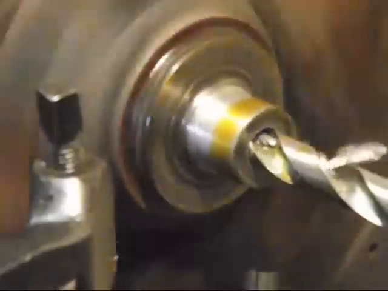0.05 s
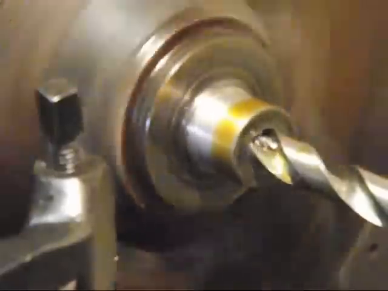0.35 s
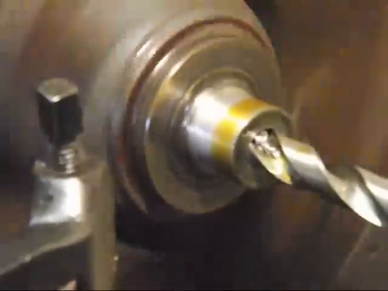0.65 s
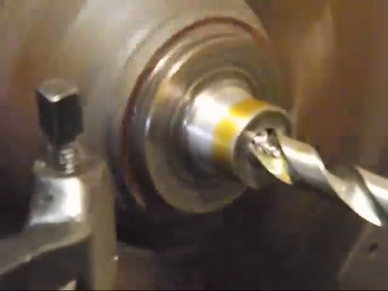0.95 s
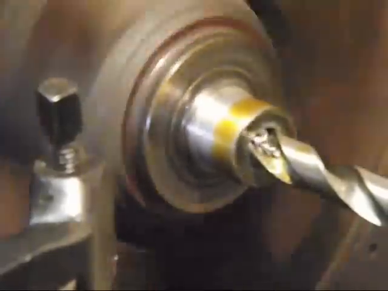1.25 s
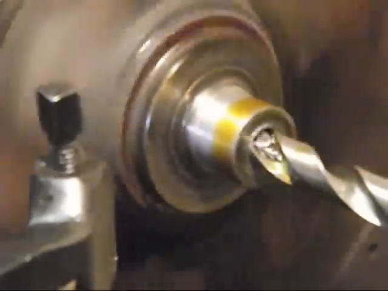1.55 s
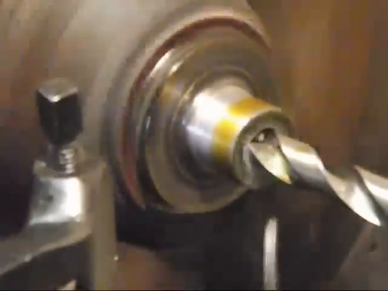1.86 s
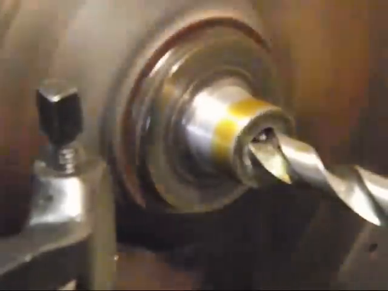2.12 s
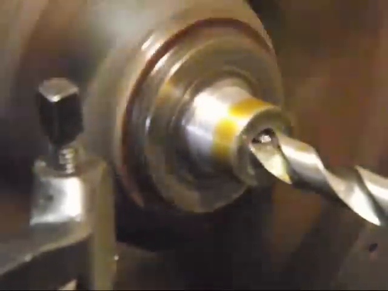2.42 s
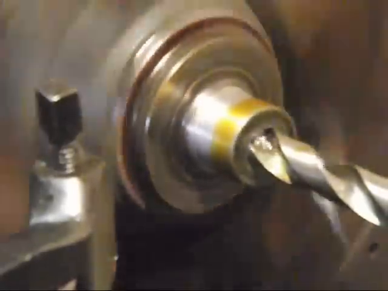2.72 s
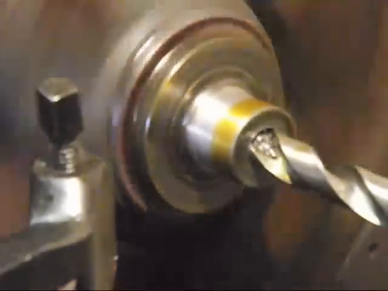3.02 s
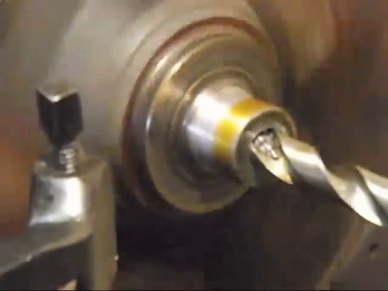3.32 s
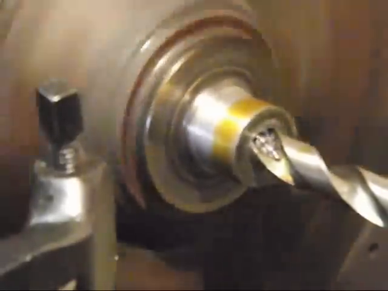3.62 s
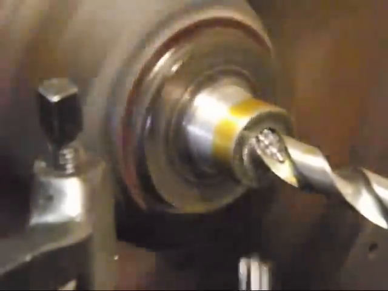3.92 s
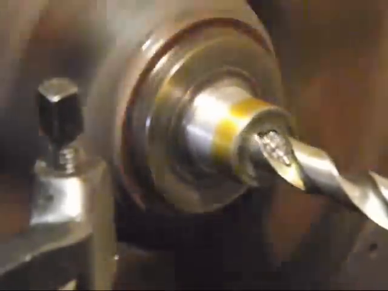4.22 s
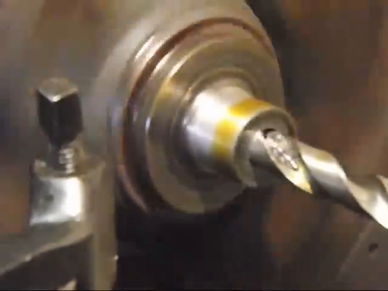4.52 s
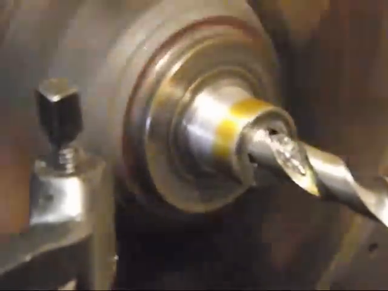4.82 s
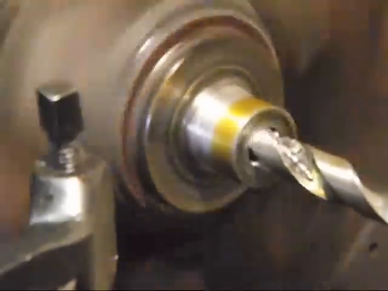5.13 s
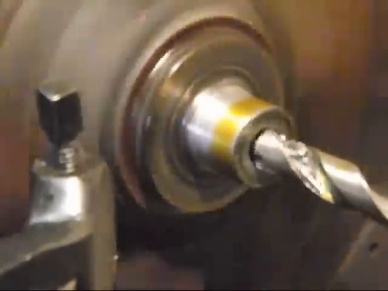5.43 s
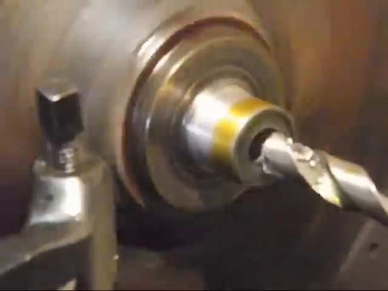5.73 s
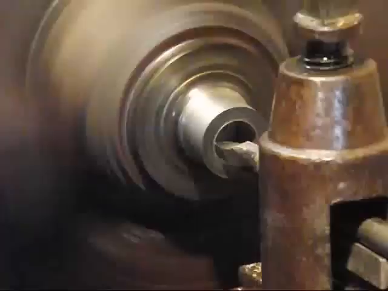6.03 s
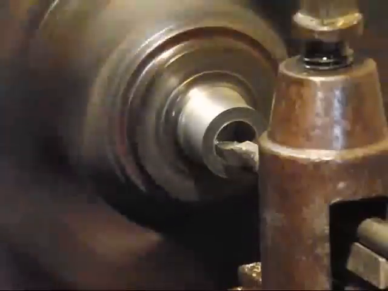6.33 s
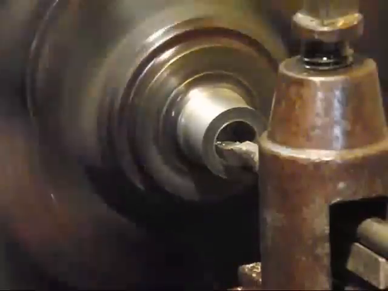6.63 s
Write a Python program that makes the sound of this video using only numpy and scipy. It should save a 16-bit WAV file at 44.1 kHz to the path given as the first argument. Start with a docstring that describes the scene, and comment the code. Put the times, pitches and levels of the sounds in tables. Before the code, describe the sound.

A metal lathe runs close to the microphone in a workshop for the whole six and a half seconds or so. Its loose drive makes a dense gear clatter with a fast rattle, about thirteen pulses a second, growing harder and softer with the load. Sharp metallic knocks land irregularly, roughly twice a second, the hardest at about 0.7, 3.1 and 4.8 seconds. A sheet-metal panel briefly rings hollow, most clearly near 1.8, 4.9 and 5.9 seconds. Under the clatter, a drill bit cutting the spinning steel gives a rough, wavering high ring, strongest around 2 seconds, near 5 and just before 6. A quiet low motor hum lies beneath everything. At about 6 seconds the microphone changes position: the clatter continues with a slightly different tone and the drill's ring drops back. The room sound is short and slight, the treble gritty and a little overloaded.

```python
"""A loose lathe drive clatters without pause, close to the microphone in a workshop, and rattles once a
spindle turn, harder or softer as belt and wheels swing the load. Now and then the slack closes with a
hard knock or a sheet-metal panel rings along. A drill cuts the spinning steel and makes it sing near
2 kHz; the motor hums below. Near the end the microphone moves from beside the drill to behind the
tool post. It sits in a small camera that overloads and samples coarsely, so the treble is gritty."""
import sys
import numpy as np
from scipy import signal
from scipy.fft import rfft, irfft, next_fast_len
from scipy.io import wavfile
from scipy.ndimage import map_coordinates

SR = 44100
rng = np.random.default_rng(int(sys.argv[2]) if len(sys.argv) > 2 else 0)


def waveform_to_disk(signal):
    """Save audio, clipped to [-1, 1], as 16-bit WAV at the path in sys.argv[1]."""
    frames = np.transpose(np.atleast_2d(signal))
    scaled = np.clip(frames, -1, 1) * 32767
    samples = np.round(scaled).astype(np.int16)
    wavfile.write(sys.argv[1], SR, samples)


N = 293706
MOVE_S = 6.03  # the microphone changes place
RATTLE_DB = -18.5  # a usual rattle at mean load

# spindle speed: (time [s], speed [turns/s])
SPINDLE_SPEED = [(0, 13.17), (1, 13.24), (2.5, 13.08), (3.5, 13.335), (4.5, 13.92), (5.3, 13.49),
                 (6.03, 14.16)]
# load swings at the gears, a row for each rate in load(): (depth [dB], place of the peak [cycles])
GEAR_SWINGS = [(3, 0.63), (1.38, 0.51), (0.98, 0.025), (1.2, 0.084), (.25, 0.12)]
# the same swings at the motor: (depth [dB], place of the peak [cycles])
MOTOR_SWINGS = [(1.8, 0.47), (.55, 0.26), (1.4, 0.91), (.35, .93), (1.1, 0.39)]


def amp(db):
    """Decibels to gain."""
    return 10 ** (np.asarray(db) / 20)


def unit(x):
    """Scale to rms 1."""
    return x / np.sqrt(np.mean(x ** 2) + 1e-20)


def along(points, hz):
    """Read (frequency [Hz], value) points on a log axis."""
    freqs, values = np.transpose(points)
    return np.interp(np.log(hz + 1), np.log(freqs + 1), values)


def clock():
    """The time of every sample."""
    return np.arange(N) / SR


def curves(rows):
    """One value per sample for each column after the time."""
    times, *columns = np.transpose(rows)
    return [np.interp(clock(), times, column) for column in columns]


def wobble(rate, step=32):
    """A smooth random curve, rate knots a second."""
    at = np.arange(0, N + step, step)
    knots = rng.standard_normal(int(N * rate / SR) + 4)
    return np.interp(np.arange(N), at, map_coordinates(knots, [at * rate / SR]))


def filtered(x, response):
    """Shape x by a gain that depends on frequency."""
    size = next_fast_len(N + SR // 2)
    return irfft(rfft(x, size) * response(np.fft.rfftfreq(size, 1 / SR)), size)[:N]


def ringing(x, level_db):
    """Pass x through the causal filter that has these gains."""
    cepstrum = irfft(np.log(amp(level_db)))
    half = len(cepstrum) // 2
    cepstrum[1:half] *= 2
    cepstrum[half + 1:] = 0
    return signal.oaconvolve(x, irfft(np.exp(rfft(cepstrum))))[:len(x)]


def spindle_turns(skipped_turns=3.92):
    """The running count of spindle turns; it skips ahead as the microphone changes place."""
    speed, = curves(SPINDLE_SPEED)
    return np.cumsum(speed) / SR + skipped_turns * (clock() > MOVE_S)


def load(swings, belt=0.2914, wheel=0.1264, step=64):
    """The load in dB: effort plus the swings of belt and slow wheel, both given in laps per turn."""
    # how hard the machine works: (time [s], effort [dB])
    effort = [(0, 2), (.6, -0.5), (.85, -3), (1.15, 0.3), (1.55, -1), (1.9, -0.5), (2.2, 1.2), (2.9, 1.9),
              (3.42, 2.5), (3.72, -2), (4.3, -0.8), (4.8, 1), (5.3, 1), (5.66, -3), (5.87, 0), (6.15, 0),
              (6.66, -1)]
    effort_db, = curves(effort)
    rates = [belt, 2 * belt, wheel, belt + wheel, belt - wheel]  # the last two are their beats
    turns = spindle_turns()[::step]
    swing_db = sum(db * np.cos(2 * np.pi * (rate * turns - peak))
                   for rate, (db, peak) in zip(rates, swings))
    return effort_db + np.interp(clock(), clock()[::step], swing_db)


def contacts(rate, scatter_db, scuff_t60, ripple_db, mains_hz=60):
    """Irregular steel-on-steel scuffs of rms 1; the motor's torque ripple sways their force."""
    grit = rng.standard_normal(N)
    jitter, strength = rng.standard_normal((int(rate * N / SR), 2)).T
    times = np.abs(np.arange(len(jitter)) + .5 * jitter) / rate
    force = amp(scatter_db * strength + ripple_db * np.sin(2 * np.pi * 2 * mains_hz * times))
    energy = np.bincount((times * SR).astype(int), force ** 2, N)[:N]
    decay = np.exp(-2 * np.log(1000) / SR / scuff_t60)
    return unit(grit * np.sqrt(signal.lfilter([1], [1, -decay], energy)))


def struck(strikes, hz, detune, level_db, attack, t60):
    """One damped mode, set ringing at each (time [s], level [dB]) at a slightly different pitch."""
    out, t = np.zeros(N + SR), np.arange(SR // 3) / SR
    envelope = (1 - np.exp(-t / attack)) * np.exp(-np.log(1000) * t / t60)
    for (s, db), offset in zip(strikes, rng.standard_normal(len(strikes))):
        tone = np.sin(2 * np.pi * hz * (1 + detune * offset) * t)
        out[round(s * SR):][:len(t)] += amp(db + level_db) * envelope * tone
    return out[:N]


def headstock(blows, colour, size=8192):
    """Blows heard through the casting, whose resonances differ at the two microphone positions."""
    # casting modes: (centre [Hz], width [Hz], lift beside the drill [dB], lift behind the tool post [dB])
    modes = [(378, 44, 8.5, 5), (557, 46, 4, 10.5), (599.6, 26, 7.5, -5), (729, 61, 5, 3),
             (808, 20, 8.5, 6.5), (911, 50, 5.5, -1), (960.4, 23, 10, 11), (1107, 130, 3, 12),
             (1277, 16, 6, 3), (1383, 28, 5.5, 5), (1590, 106, 4, 5), (1825, 34, 6, 5),
             (1940, 78, 2.5, 7.5), (2090, 30, 4, 4), (2783, 180, 3.5, 2.5), (3063, 165, 5.5, 6),
             (3174, 37, 6, 2), (3290, 50, -1, -1), (3950, 60, 1, 1)]
    hz = np.fft.rfftfreq(size, 1 / SR)
    lifts_db = sum(np.outer(lift, 1 / (1 + (2 * (hz - centre) / width) ** 2))
                   for centre, width, *lift in modes)
    parts = np.split(blows, [int(MOVE_S * SR)])
    return np.concatenate([ringing(part, db) / np.sqrt(np.mean(amp(db) ** 2))
                           for part, db in zip(parts, along(colour, hz) + lifts_db)])


def workshop(x):
    """The room's short answer, dying faster in the treble."""
    # reverberation: (frequency [Hz], t60 [s])
    decay_times = [(200, 0.23), (2000, 0.22), (5000, 0.09)]
    hz, t, noise = signal.stft(rng.standard_normal(SR // 2), SR, nperseg=256)
    fade = np.exp(-np.log(1000) * t / along(decay_times, hz)[:, None])
    tail = signal.istft(noise * fade, SR, nperseg=256)[1]
    return signal.fftconvolve(x, tail / np.linalg.norm(tail))[:N]


def motor():
    """Slightly unsteady hum over the rumble of belt and bearings; both swell under load."""
    # motor and shaft tones: (frequency [Hz], relative level [dB])
    tones = [(60, -7.5), (68, -14.5), (120, -9), (129, -9)]
    # belt and bearing noise: (frequency [Hz], spectral level [dB])
    rumble_colour = [(12, 5.5), (32, -8.5), (62, -4), (80, -4), (97, 5), (112, -13), (132, 3.5), (158, -1),
                     (180, -2), (260, -10), (500, -5), (1500, -50)]
    level_db = -37 + 1.13 * load(MOTOR_SWINGS) + 0.8 * wobble(17)
    hum = sum(amp(db) * np.sqrt(2) * np.sin(2 * np.pi * hz * clock() + 1.2 * wobble(3.13))
              for hz, db in tones)
    rumble = unit(filtered(rng.standard_normal(N), lambda hz: amp(along(rumble_colour, hz))))
    return amp(level_db) * (hum + amp(-0.2) * rumble)


def panel():
    """Now and then a sheet-metal panel swells into a hollow ring, roughened by the shaking."""
    # the panel rings along: (time [s], relative level [dB])
    swells = [(0.446, -22), (1.254, -19), (1.714, -23), (1.787, -16), (2.521, -25), (4.159, -31),
              (4.924, -18), (5.05, -22), (5.57, -20), (5.934, -17)]
    ring = struck(swells, hz=950, detune=0.0086, level_db=5.5, attack=0.007, t60=0.16)
    return ring * amp(3.4 * wobble(140))


def cutting(reach_hz=70):
    """The cutting lips keep the steel singing; which rings they favour shifts as the drill moves."""
    # course of the cut: (time [s], favoured pitch [Hz], relative level [dB])
    cut = [(0, 1930, -24.5), (.5, 1990, -26), (1.1, 1900, -26), (1.4, 1940, -26), (1.7, 1970, -20),
           (2.2, 1925, -20.5), (2.8, 1940, -27), (3.4, 1980, -23.5), (3.9, 2010, -29), (4.4, 2005, -26.5),
           (4.7, 2050, -23.5), (5.2, 2030, -22.5), (5.65, 2060, -27.5), (5.95, 2070, -20),
           (6.05, 1920, -31), (6.66, 1870, -27)]
    # narrow rings of drill and workpiece: (frequency [Hz], relative level [dB])
    steel_modes = [(1812, 14), (1906, 2), (1944, -1), (1964, 7.5), (2002, -23), (2062, 11), (2116, 2)]
    pitch_hz, level_db = curves(cut)
    rings, power = np.zeros(N), np.zeros(N)
    for hz, db in steel_modes:
        share = amp(db) / (1 + ((hz - pitch_hz) / reach_hz) ** 2)
        rings += share * np.sin(2 * np.pi * hz * clock() + 1.34 * wobble(38))
        power += share ** 2
    rough = amp(2.2 * wobble(90) + 0.37 * load(MOTOR_SWINGS))  # the chip tears unevenly, loading the motor
    return amp(level_db - 2) * unit(rough * rings / np.sqrt(power))


def knocks(t60=0.086, attack=0.0018):
    """Each hard knock chatters out quickly, rings the gears and sets the gear cover booming."""
    # the slack closes hard: (time [s], relative level [dB])
    strikes = [(0.108, -17.5), (0.183, -12), (0.714, -9.5), (1.241, -12), (1.469, -13), (1.479, -29),
               (2.006, -15), (2.547, -14), (2.778, -26), (2.917, -15.5), (3.075, -9), (3.598, -12),
               (4.044, -15), (4.552, -14.5), (4.84, -11.5), (5.348, -12.5), (5.567, -14.5), (5.798, -17.5),
               (6.219, -24), (6.284, -13), (6.511, -12)]
    # sharp chatter: (frequency [Hz], spectral level [dB])
    colour = [(90, -19.5), (380, -11.5), (900, -13.5), (1250, -5.5), (1650, 2), (2400, -10), (2900, 1.5),
              (3250, 4), (3650, -2.5), (4400, -1), (5300, -5.5), (7000, -48)]
    # gear cover and three gears: (frequency [Hz], pitch spread [ratio], level [dB], attack [s], t60 [s])
    modes = [(201.6, 0.021, -18.5, 0.0043, 0.26), (1653, .015, -2.5, 0.0027, 0.096),
             (3220, 0.0177, 7, 0.002, 0.078), (4380, 0.0147, -5, .003, 0.086)]
    force, t = np.zeros(N + SR), np.arange(SR // 3) / SR
    envelope = np.exp(-np.log(1000) * t / t60) * (1 - np.exp(-t / attack))
    for s, db in strikes:
        force[round(s * SR):][:len(t)] += amp(db) * envelope
    bounces = contacts(rate=1100, scatter_db=3, scuff_t60=0.011, ripple_db=-1.5)
    chatter = headstock(amp(5.5) * force[:N] * bounces, colour)
    return chatter + sum(struck(strikes, *mode) for mode in modes)


def clatter():
    """Light, dense contacts of the running gears, louder under load."""
    # light contacts: (frequency [Hz], spectral level [dB])
    colour = [(60, -29), (300, -15), (460, -17), (620, -6.5), (880, -5.5), (1020, -6), (1450, -4),
              (1850, -1), (2350, 0.5), (2850, 1), (3200, -0.5), (3550, -2.5), (4300, -7.5), (5300, -16),
              (7000, -50)]
    level_db = -19.5 + 0.69 * load(GEAR_SWINGS)
    teeth = contacts(rate=1300, scatter_db=1.5, scuff_t60=0.0095, ripple_db=-1.3)
    return headstock(amp(level_db + 0.29 * wobble(40)) * teeth, colour)


def rattle_surges(place_in_turn=.64, usual_length_s=0.035, scatter_db=1.5):
    """One surge per spindle turn, as strong as the load is then, or harder where the slack catches."""
    # turns on which the slack catches: (time [s], level [dB], length [s])
    catches = [(0.111, -17, 0.095), (0.431, -13, 0.031), (0.493, -14.5, 0.035), (0.656, -15, 0.098),
               (0.949, -14, 0.024), (1.107, -16, 0.034), (1.248, -13.5, 0.047), (1.718, -12.5, 0.019),
               (1.784, -13, 0.028), (1.943, -14.5, 0.066), (2.174, -15.5, 0.034), (2.241, -13.5, 0.034),
               (2.322, -15.5, 0.032), (2.709, -15.5, .024), (2.776, -12.5, 0.033), (3.007, -15, 0.056),
               (3.229, -13, 0.015), (3.308, -11.5, 0.028), (3.453, -15, 0.041), (3.531, -14, 0.035),
               (3.826, -11.5, 0.031), (3.975, -16, 0.031), (4.119, -12.5, 0.029), (4.337, -12, 0.03),
               (4.777, -12.5, 0.025), (4.993, -14, 0.025), (5.285, -13, 0.02), (5.505, -16.5, 0.024),
               (5.726, -19, 0.015), (5.873, -13, 0.033), (5.929, -14.5, 0.041), (6.215, -14.5, 0.058),
               (6.296, -12.5, 0.033)]
    at = np.flatnonzero(np.diff(np.floor(spindle_turns() - place_in_turn)))
    level_db = RATTLE_DB + 0.82 * load(GEAR_SWINGS) + scatter_db * wobble(20)
    speed, = curves(SPINDLE_SPEED)
    to_catch_s = np.abs(at[:, None] / SR - np.transpose(catches)[0]).min(1)
    usual = to_catch_s > .5 / speed[at]  # no catch within half a turn
    return list(catches) + [(i / SR, level_db[i], usual_length_s) for i in at[usual]]


def rattles(rise_share=0.45, ring_on_s=0.002, ring_scatter_db=4.0):
    """Once a turn the drive's slack hammers in a short surge; each rings the gears a little differently."""
    # gear rings: (frequency [Hz], pitch spread [ratio], relative level [dB])
    gear_modes = [(1658, 0.027, -13), (2894, 0.049, -14.5), (3140, 0.0208, -9), (3280, 0.012, -9.5),
                  (4290, 0.0194, -18)]
    # hard contacts: (frequency [Hz], spectral level [dB])
    colour = [(90, -26.5), (205, -8.5), (290, -21), (620, -11.5), (880, -7), (1200, -10.5), (1700, -1.5),
              (2400, -1), (2900, 0), (3250, 0.5), (3600, -4), (4400, -8), (5300, -9.5), (7000, -44.5)]
    t, power, clank = clock(), np.zeros(N), np.zeros(N)
    hz, spread, ring_db = np.transpose(gear_modes)[..., None]
    blows = contacts(rate=800, scatter_db=2.5, scuff_t60=0.019, ripple_db=1)
    surges = rattle_surges()
    chance = rng.standard_normal((len(surges), 3, len(gear_modes), 1))
    for (s, db, length), (detune, strength, phase) in zip(surges, chance):
        near = slice(max(0, int((s - .12) * SR)), int((s + .12) * SR))
        lag = t[near] - s
        rise, fall = rise_share * length, (1 - rise_share) * length
        power[near] += amp(db) ** 2 * np.exp(-(lag / np.where(lag < 0, rise, fall)) ** 2)
        swell = np.exp(-.5 * (lag / np.where(lag < 0, rise, fall + ring_on_s)) ** 2)
        tones = np.sin(2 * np.pi * (hz * (1 + spread * detune) * lag + phase))
        rings = amp(ring_db + ring_scatter_db * strength) * tones
        extra_db = 0.18 * (db - RATTLE_DB)  # harder rattles ring more than in proportion
        clank[near] += amp(db + extra_db) * swell * rings.sum(0)
    return headstock(np.sqrt(power) * blows, colour) + clank


def scene():
    """The lathe close to one microphone, with a little of the room."""
    lathe = clatter() + rattles() + knocks() + panel() + cutting()
    return (lathe + amp(-19.5) * workshop(lathe) + motor())[None]


def record(dry, hold=4, band_hz=5300, top_hz=14120):
    """The camera overloads and holds each sample: the steps mirror the sound into a gritty treble."""
    band = filtered(dry[0], lambda hz: 1 / np.sqrt(1 + (hz / band_hz) ** 24))
    coarse = np.clip(band[::hold], -.97, .97)
    steps = np.repeat(coarse, hold)[:N]
    return filtered(steps, lambda hz: hz < top_hz)[None]


dry = scene()
out = record(dry)
waveform_to_disk(out)
```